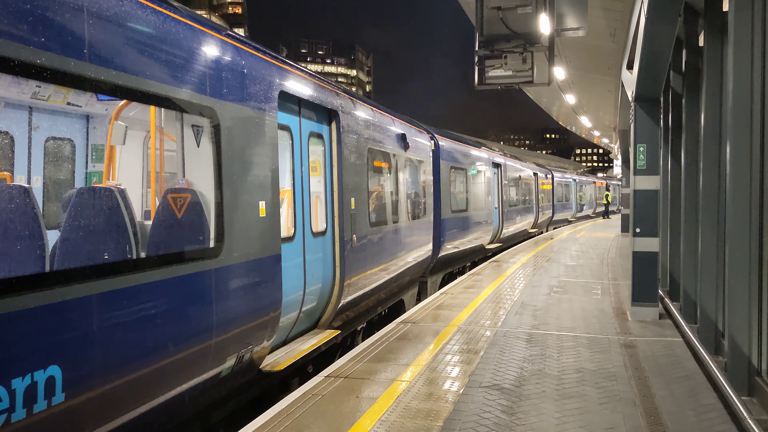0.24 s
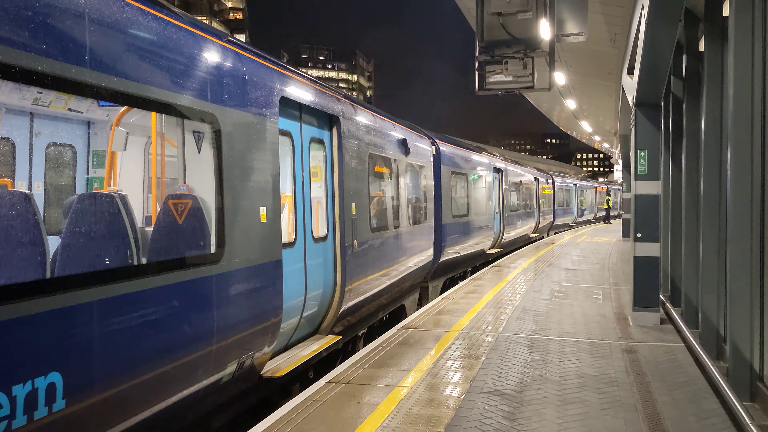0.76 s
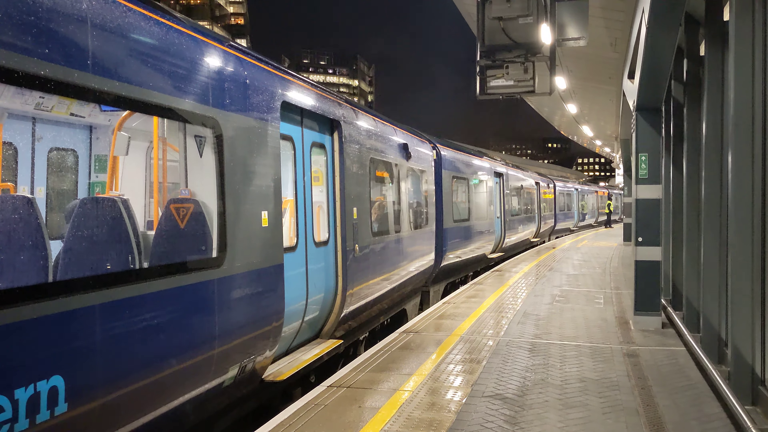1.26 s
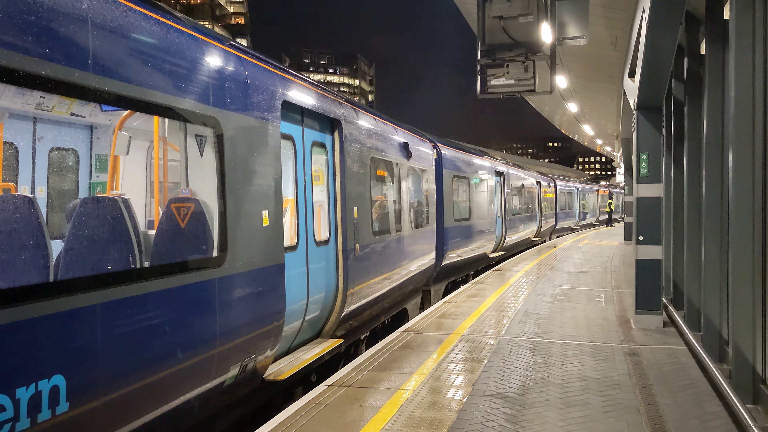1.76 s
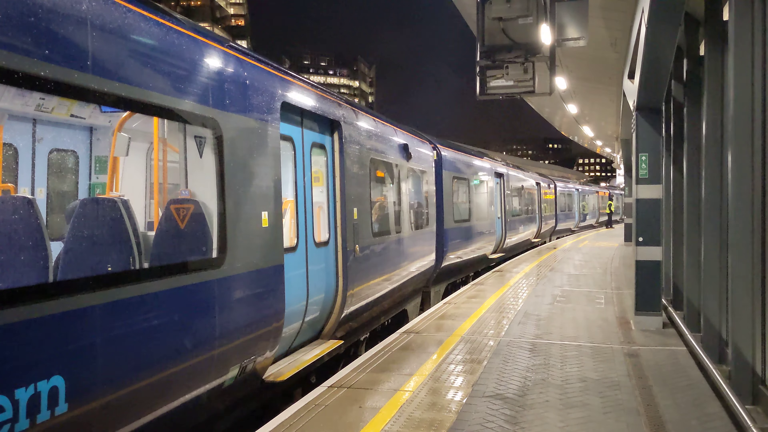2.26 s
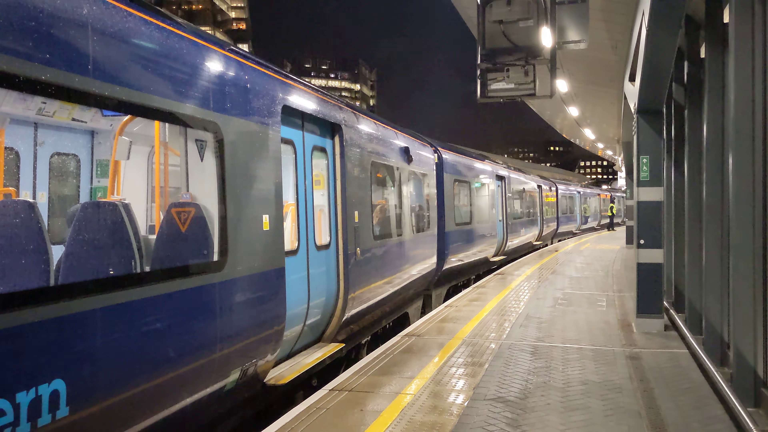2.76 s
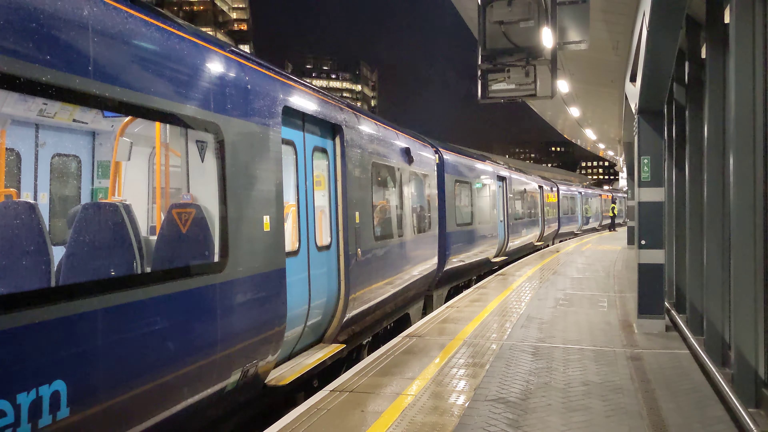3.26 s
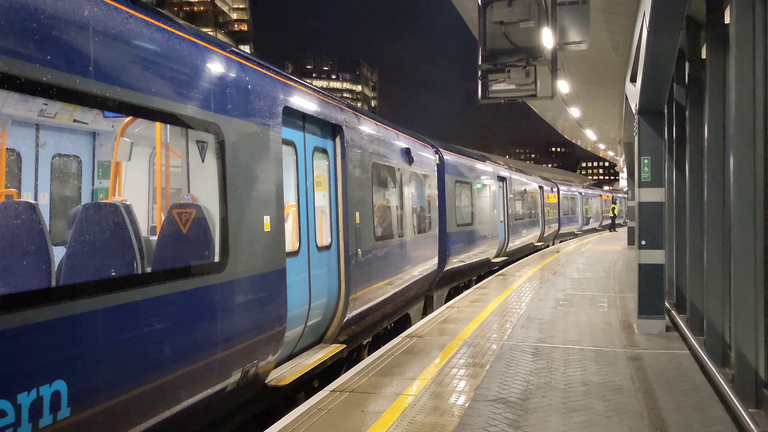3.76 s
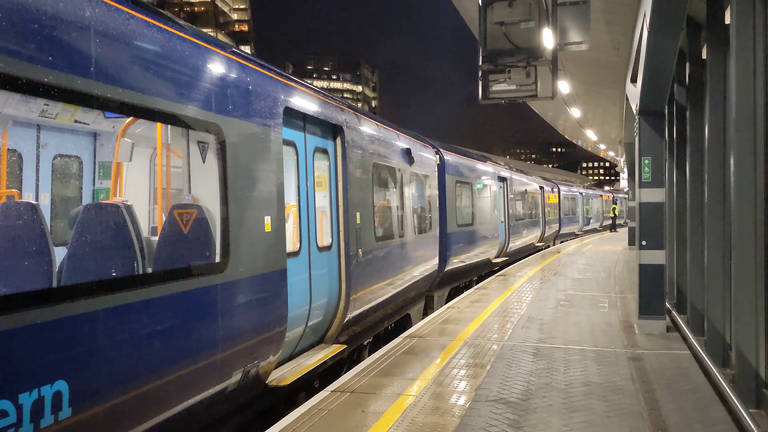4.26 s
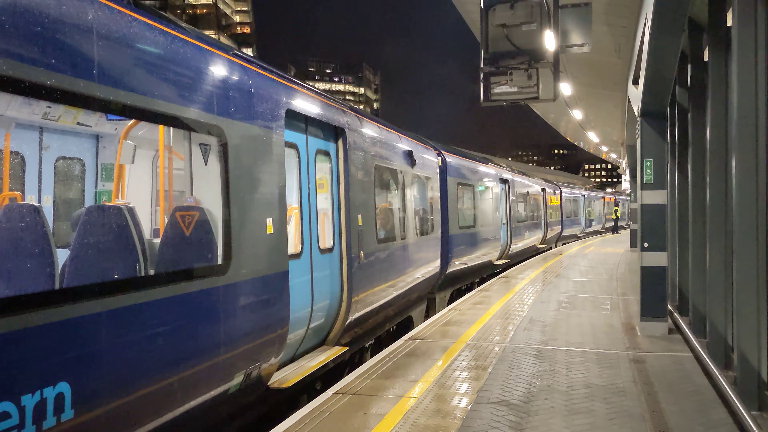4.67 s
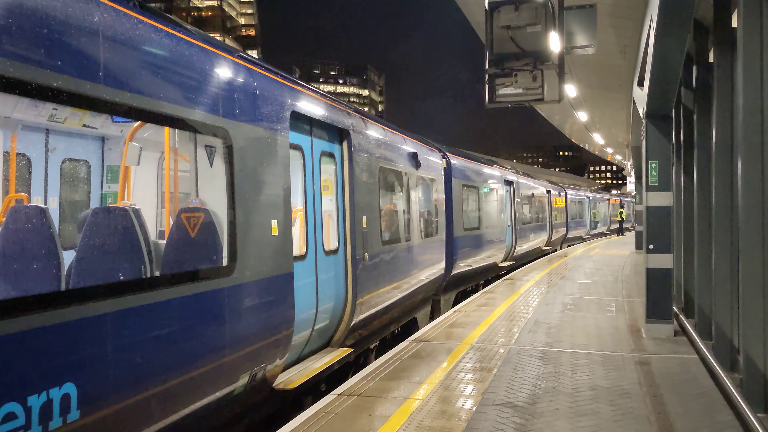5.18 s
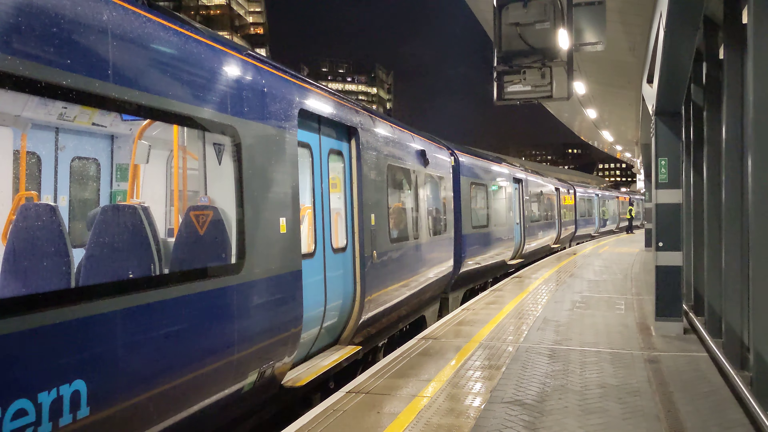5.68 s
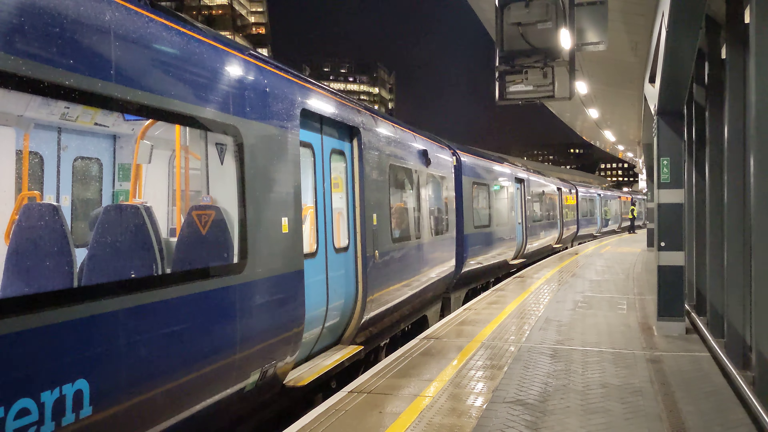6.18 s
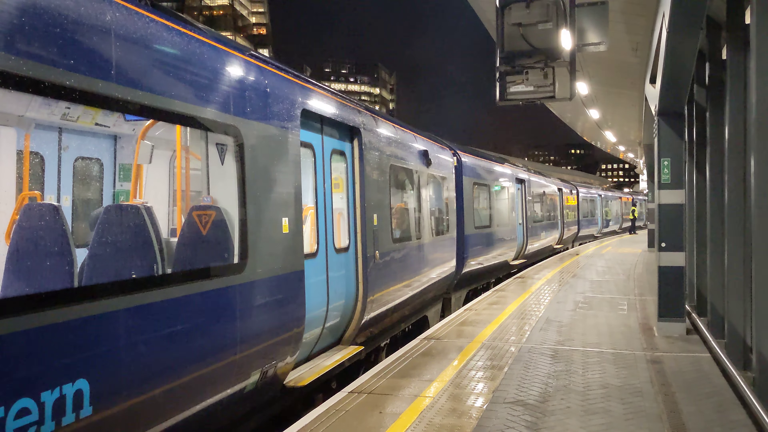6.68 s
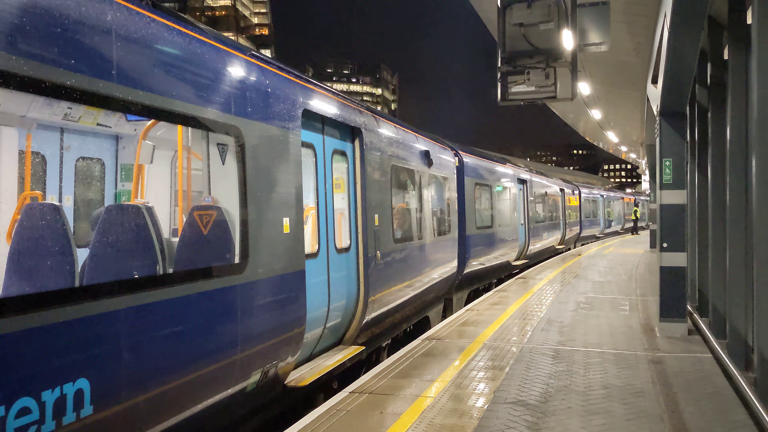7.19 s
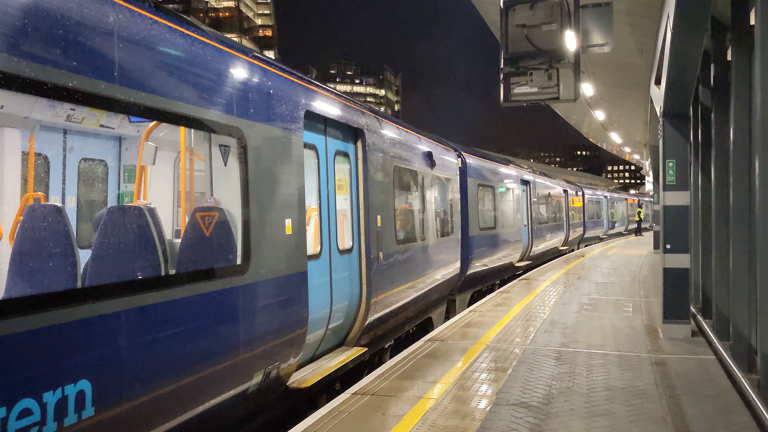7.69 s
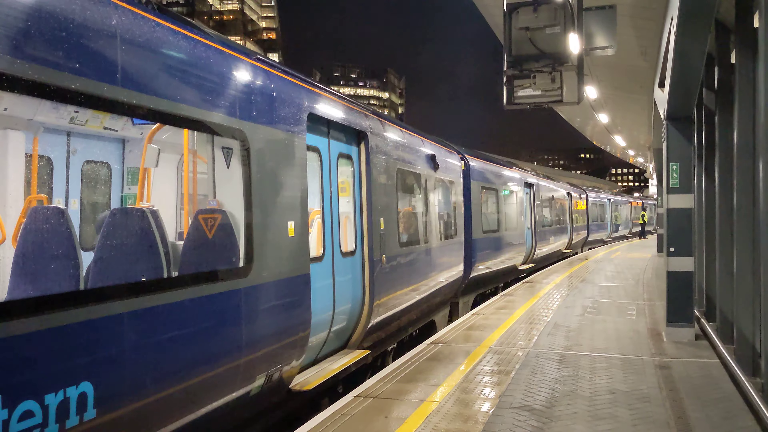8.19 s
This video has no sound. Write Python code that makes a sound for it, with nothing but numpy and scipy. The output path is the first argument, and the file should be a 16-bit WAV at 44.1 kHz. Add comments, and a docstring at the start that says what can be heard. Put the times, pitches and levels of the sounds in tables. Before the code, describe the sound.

A standing electric train drones and whines thinly at a covered platform while wind gusts thump the right microphone, stopping after five seconds

```python
"""A covered, curved platform where an electric train stands still, heard from a hand-held phone with two ports.
Its fans drone as noise shaped by duct resonances, with unsteady blade tones; its converters sing in thin tones,
spread by the canopy and the wall. For the first five seconds gusts buffet the right port: shaped turbulence with
short pressure swings as knocks and a few shaken cycles as thumps. Two brief whines and two faint ticks pass."""
import sys
import numpy as np
from scipy import signal
from scipy.fft import rfft, irfft
from scipy.io import wavfile
from scipy.ndimage import uniform_filter1d

SR = 44100
rng = np.random.default_rng(int(sys.argv[2]) if len(sys.argv) > 2 else 0)


def transcribe(signal):
    """Save signal, clipped to [-1, 1], as a 16-bit WAV file at the path in sys.argv[1]."""
    frames = np.atleast_2d(signal).T
    limited = np.clip(frames, -1, 1)
    pcm = np.round(limited * 32767).astype(np.int16)
    wavfile.write(sys.argv[1], SR, pcm)


N = 372204
TIME = np.arange(N) / SR  # s
FREQ = np.maximum(np.fft.rfftfreq(N, 1 / SR), 1)  # Hz

# Broad fan noise along the train, before ducts and trim. Each row: frequency [Hz], density [dB per Hz].
FAN_NOISE = [(22, -68), (55, -61.5), (95, -69.5), (160, -61.5), (250, -58), (450, -66), (750, -75),
             (1400, -78), (1750, -78), (2800, -82), (4000, -86), (5480, -92.5), (5700, -99.5),
             (6300, -106.5), (9400, -109.5), (10100, -114), (12600, -115), (15400, -120)]
# Duct and blade resonances standing out of it. Each row: frequency [Hz], width [Hz], lift [dB].
DUCT_RESONANCES = [(133, 18, 5.5), (182.3, 16, 2), (207, 24, 3.5), (259, 40, 3.5), (353, 110, 5),
                   (470, 10, 0), (532.2, 27, 5.5), (610, 60, 5.5), (679, 28, 3.5), (726, 21, 1.5),
                   (830, 14, 6), (897, 57, 7), (991, 38, 9), (1155, 21, 6), (1285, 100, 4.5),
                   (2044, 58, 3.5), (2410, 84, 7), (7900, 170, 3.5), (9240, 650, 2)]
# Likeness of the train's noise at the two ports. Each row: frequency [Hz], likeness [clipped to 0-1].
PORT_LIKENESS = [(60, 2), (300, 4), (450, 2), (750, 0.04), (1200, -0.45), (1700, 0.39), (2300, 0.24),
                 (5000, 0.22), (15000, -0.4)]
# Balance of the train's noise. Each row: frequency [Hz], left minus right [dB].
PORT_TILT = [(60, -0.5), (110, -4.5), (200, -3), (380, -1), (700, -2.5), (1290, -5.5), (2380, 2.5),
             (4400, -2.5), (8120, -1), (15000, -3.5)]
# Blade tones of the fans. Each row: frequency [Hz], level [dB].
BLADE_TONES = [(142, -50), (180, -46.5), (196, -46.5), (216, -42.5), (264, -42.5), (273, -45.5), (513, -49),
               (532, -52), (674, -56.5), (970, -60.5), (1011, -56.5), (1192, -64), (2021, -65), (2055, -62),
               (2358, -61.5)]
# Steady tones of the converters. Each row: frequency [Hz], level [dB].
STEADY_TONES = [(1735, -67), (2116, -65), (2215, -70.5), (2696, -82.5), (3324, -67), (4129, -72),
                (4230, -68), (4331, -76), (5036, -80.5), (5137, -78), (5238, -72), (5348, -76), (5398, -72),
                (5422, -75.5), (5438, -76), (5472, -80), (5522, -77), (5539, -81.5), (6144, -93),
                (6346, -93), (6447, -94), (8022, -92.5), (8048, -92), (8460, -99), (8561, -96.5),
                (9187, -96)]
# Converter tones that grow with the load. Each row: frequency [Hz], level at 0 dB load [dB].
LOAD_TONES = [(1336, -63), (1362, -64.5), (1386, -59)]
# Swell of the load. Each row: time [s], load [dB].
LOAD_SWELL = [(0, -16.5), (4, -11.5), (5, 3), (5.9, 1), (6.8, 5), (7.6, 5.5), (8.4, 5)]
# Converter tones that give way to the load. Each row: frequency [Hz], level at 0 dB load [dB],
# loss [dB per dB of load].
IDLE_TONES = [(1406, -63.5, 0.51), (1459, -61, 0.24)]
# Two faint, short whines. Each row: middle [s], length [s], pitch [Hz], level at the middle [dB].
WHINES = [(8.16, .22, 4025, -60), (8.25, .34, 1918, -53)]
# Light draught along the platform, at the right port. Each row: time [s], level before trim [dB].
DRAUGHT = [(0, -30), (0.75, -27.5), (1.0, -44.5), (1.65, -35), (2.8, -45.5), (3.15, -32), (3.5, -50),
           (3.8, -32), (4.9, -32.5), (5.3, -36), (5.6, -63)]
# Gusts on the right port, which faces the wind. Each row: start [s], length [s], level before trim [dB].
GUSTS = [(0.062, 0.069, -21), (0.70, 0.035, -26), (1.06, 0.05, -27.5), (1.338, 0.023, -22),
         (1.46, 0.051, -25), (1.82, 0.72, -20.5), (2.63, 0.034, -22.5), (3.635, 0.054, -23),
         (3.82, 0.04, -28.5), (4.09, 0.098, -28.5), (4.28, 0.12, -22.5), (4.475, 0.26, -26.5)]
# A gust curling round to the left port. Each row: start [s], length [s], level before trim [dB].
LEE_GUSTS = [(2.06, 0.042, -25.5)]
# Colour of the wind noise at the port, with a dip near 110 Hz. Each row: frequency [Hz], relative level [dB].
TURBULENCE = [(22, -10.5), (45, -3.5), (85, -4.5), (112, -11.5), (155, -0.5), (250, -6.5), (380, -8),
              (600, -22), (900, -28.5), (1400, -44.5), (2500, -66.5)]
# Small, hard eddies knocking on the right port. Each row: time [s], peak before trim [dB], centre [Hz],
# ring after it [0-1].
BUFFETS = [(0.062, -15, 438, 0.7), (0.130, -8.5, 367, 0.7), (0.1337, -9, 630, .25),
           (0.148, -16.5, 560, 0.4), (0.548, -19, 500, 0.1), (0.598, -22, 550, 0), (0.795, -21, 520, 0.3),
           (1.351, -15.5, 440, 0.26), (1.425, -18, 450, 0.5), (1.8234, -6, 312, 1), (1.835, -18, 620, .2),
           (1.843, -18, 430, 0.4), (1.8632, -10, 380, .7), (1.896, -16, 400, .3), (1.9105, -20, 400, 0.4),
           (1.9142, -8, 418, 1), (1.9257, -15, 600, 0.6), (2.006, -14, 472, 0.4), (2.074, -11, 392, .9),
           (2.136, -17, 450, .3), (2.156, -17, 420, 0.3), (2.1615, -9.5, 600, 0.1), (2.171, -5, 525, .55),
           (2.19, -10, 500, 0.2), (2.219, -13.5, 390, 0.6), (2.247, -18, 450, .3), (2.2596, -9.5, 450, 0.4),
           (2.279, -5, 330, .8), (2.2930, -8.5, 480, 0.8), (2.2994, -4.5, 490, .2), (2.338, -19, 420, 0.3),
           (2.406, -18, 400, .4), (2.4232, -12.5, 430, .5), (2.485, -9.5, 358, 0.2), (2.532, -18, 470, 0.2),
           (3.626, -16, 290, .9), (3.672, -14, 350, .4), (4.058, -25, 330, .3), (4.100, -19.5, 380, .8),
           (4.156, -10.5, 360, 0.5), (4.2602, -8.5, 275, 0.9), (4.3002, -12.5, 400, 0.8),
           (4.309, -20, 470, 0.2), (4.318, -13, 360, .5), (4.329, -23, 380, .9), (4.392, -16, 270, 0.7),
           (4.478, -10, 440, .45), (4.487, -18, 390, 0.5), (4.551, -15, 480, 0.3), (4.623, -12.5, 370, 0.4),
           (4.696, -15, 360, 0.5), (4.7043, -12.5, 620, 0.6), (4.718, -13, 430, 0.3),
           (4.8502, -8.5, 434, 0.8), (5.026, -16, 430, 0.6)]
# Big, slow eddies thumping on the right port. Each row: time [s], peak before trim [dB], pitch [Hz].
THUMPS = [(0.076, -15, 140), (0.121, -6, 168), (0.469, -12, 218), (1.347, -9.5, 158), (1.429, -14, 150),
          (1.784, -10.5, 170), (1.841, -7, 159), (1.856, -8, 159), (1.887, -7, 184), (1.924, -8, 219),
          (2.001, -15, 186), (2.076, -10, 197), (2.115, -4.5, 159), (2.149, -5, 155), (2.207, -6, 177),
          (2.287, -9.5, 170), (2.362, -11, 161), (2.429, -10, 142), (2.465, -8, 188), (2.635, -9.5, 177),
          (3.645, -8.5, 166), (3.685, -7.5, 135), (4.12, -19, 130), (4.275, -14, 119), (4.339, -19, 150),
          (4.499, -10, 156), (4.562, -13.5, 190), (4.637, -17, 140), (4.71, -11.5, 224)]
# Tiny high ticks. Each row: time [s], strike level before the treble filter and halving [dB].
TICKS = [(4.574, -47), (7.2015, -51)]

PORT_LAG_S = .00031  # the part of the train's noise common to both ports reaches the left this much later
GUST_ATTACK_S, GUST_RELEASE_S = 0.02, 0.027  # time constants shared by all gusts
LEE_DB = -21  # the left port lies in the lee and gets this share of the wind
# lesser eddies: number a second, peak over the wind's level before trim and its spread
EDDY_RATE, EDDY_DB, EDDY_SPREAD_DB = 20, -2, 3
EDDY_HZ, EDDY_SPREAD_OCT = 394, 0.64  # their centre and its spread in octaves
TOP_HZ = 15600  # upper edge of the phone's band


def fans(drone_db=0.1, swell_db=0.43, hiss_swell_db=0.32, split_hz=900):
    """Air noise through resonant ducts; the bass is alike at both ports, the treble comes from all sides."""
    db = spectrum(FAN_NOISE)
    for hz, width, lift in DUCT_RESONANCES:
        db = db + lift / (1 + (2 * (FREQ - hz) / width) ** 2)
    gain = undb(db + drone_db) * np.sqrt(SR / 2)
    alike = np.clip(spectrum(PORT_LIKENESS), 0, 1)
    common = white() * np.sqrt(alike)
    delayed = common * np.exp(-2j * np.pi * FREQ * PORT_LAG_S)
    half_tilt = spectrum(PORT_TILT) / 2
    left = (delayed + white() * np.sqrt(1 - alike)) * undb(half_tilt)
    right = (common + white() * np.sqrt(1 - alike)) * undb(-half_tilt)
    air = np.array([left * canopy(), right * canopy()]) * gain
    low = 1 / (1 + (FREQ / split_hz) ** 2)
    # the drone throbs a little, the hiss swells more slowly
    drone = irfft(air * low, N) * undb(swell_db * walk(13))
    hiss = irfft(air * (1 - low), N) * undb(hiss_swell_db * walk(2.4))
    return drone + hiss


def canopy(count=40):
    """Response of weak reflections off canopy, wall and cars: they ripple the treble most."""
    echoes = np.zeros(N)
    lags = rng.uniform(.004, .045, size=count)  # s
    echoes[(lags * SR).astype(int)] = .045 * rng.standard_normal(count)
    return 1 + rfft(echoes) * FREQ / (FREQ + 900)


def blades(diffuse_hz=600, fade_db=1.3, fade_rate=1.79):
    """Unsteady blade tones, each fading on its own; long waves are the same at both ports."""
    out = np.zeros((2, N))
    for hz, db in BLADE_TONES:
        pair = tone(hz, waver_rate=6, scatter=0.87) * unit(undb(fade_db * walk(fade_rate)))
        out += undb(db) * (pair if hz > diffuse_hz else pair[0])
    return out


def converters():
    """Switching tones from the coils under the cars; some grow with the load and some give way."""
    load_db = curve(LOAD_SWELL)
    constant = sum(undb(db) * tone(hz, waver_rate=4, scatter=0.55) for hz, db in STEADY_TONES)
    loaded = sum(undb(db) * tone(hz, waver_rate=3.2, scatter=0.23) for hz, db in LOAD_TONES)
    idle = np.zeros((2, N))
    for hz, db, loss in IDLE_TONES:
        idle += undb(db - loss * load_db) * tone(hz, waver_rate=5, scatter=1.0)
    return constant + loaded * undb(load_db) + idle


def whine():
    """Brief thin squeaks: wavering tones under a half-ellipse swell."""
    out = np.zeros((2, N))
    for middle, length, hz, db in WHINES:
        swell = np.sqrt(np.clip(1 - (2 * (TIME - middle) / length) ** 2, 0, 1))
        out += undb(db) * swell * tone(hz, waver_rate=20, scatter=0.55)
    return out


def wind(gust_db, wind_db, flutter_db=3.0, rasp_db=7.0, rasp_hz=420, rasp_level_db=-3.0, brighten=0.042,
         strong_db=-16, deep_hz=110, rumble_db=-1.7, deep_db=-4.0, deep_growth=0.96):
    """Turbulence at one port; small eddies spurt and outgrow the rumble, the deepest heaves more slowly."""
    flow = white() * undb(spectrum(TURBULENCE)) / (1 + (FREQ / 3000) ** 4)
    flow = flow / np.std(irfft(flow, N))
    large = 1 / (1 + (FREQ / rasp_hz) ** 4)
    deep = 1 / (1 + (FREQ / deep_hz) ** 6)
    over_db = gust_db - strong_db
    flutter = unit(undb(flutter_db * walk(45)))
    rumble = even_out(irfft(flow * large * (1 - deep), N), window_s=0.03) * flutter * undb(rumble_db)
    heave = even_out(irfft(flow * deep, N), window_s=0.12) * undb(deep_db + (deep_growth - 1) * over_db)
    spurts = unit(undb(rasp_db * walk(130)))
    rasp = irfft(flow * (1 - large), N) * spurts * undb(rasp_level_db + brighten * over_db)
    return (heave + rumble + rasp) * undb(gust_db + wind_db)


def gust_power(gusts):
    """Power of gusts that build, hold and die away exponentially."""
    power = np.zeros(N)
    for start, length, db in gusts:
        early = np.maximum(start - TIME, 0)
        late = np.maximum(TIME - start - length, 0)
        power += (undb(db) * np.exp(-early / GUST_ATTACK_S - late / GUST_RELEASE_S)) ** 2
    return power


def thumps(thump_db=-3.0, build_s=0.0037, fade_s=0.009, heave_db=-17, heave_hz=38):
    """Each big eddy shakes the air at the port for a few cycles, over one deep heave of pressure."""
    out = np.zeros(N)
    for (s, db, hz), turn in zip(THUMPS, rng.uniform(size=len(THUMPS))):
        near, age = around(s)
        envelope = np.exp(-(age / np.where(age < 0, build_s, fade_s)) ** 2)
        shake = np.sin(2 * np.pi * (hz * age + turn)) * envelope
        heave = undb(heave_db) * swing(2 * np.pi * heave_hz * age)
        out[near] += undb(db + thump_db) * (shake + heave)
    return out


def buffets(rows, knock_db=-0.5, ring_hz=175, glide_s=0.0016, ring_s=0.01, edge_db=-27, edge_ratio=1.7,
            shred_db=-17, build_s=.003, shred_s=0.0094, count=4096):
    """Each small eddy pulls and pushes the air once, then rings with a fast glide to ring_hz and a ragged tail."""
    out = np.zeros(N)
    for s, db, hz, ring in rows:
        near, age = around(s)
        angle, after = 2 * np.pi * hz * age, np.maximum(age, 0)
        # the second, quicker swing steepens the edge
        pull_push = swing(angle) + undb(edge_db) * swing(edge_ratio * angle)
        # phase of a ring gliding from the eddy's centre to ring_hz
        turns = ring_hz * after + (hz - ring_hz) * glide_s * (1 - np.exp(-after / glide_s))
        onset = 1 - np.exp(-(np.pi * hz * after) ** 2)
        wake = np.sin(2 * np.pi * turns) * onset * np.exp(-after / ring_s)
        band = signal.butter(3, [hz / 2, hz * 1.6], "band", fs=SR, output="sos")
        shred = unit(signal.sosfilt(band, np.resize(rng.standard_normal(count), len(age))))
        shred = shred * np.exp(-np.abs(age) / np.where(age < 0, build_s, shred_s))
        knock = pull_push + np.clip(ring, 0, 1) * wake + undb(shred_db) * shred
        out[near] += undb(db + knock_db) * knock
    return out


def eddies(gust_db, count=400, hardest_db=-20, ring=0.29):
    """Lesser eddies at random moments, as buffet rows; their strength follows the wind up to a ceiling."""
    times = np.cumsum(rng.exponential(size=count)) / EDDY_RATE
    strength, pitch = rng.standard_normal((count, 2)).T
    carried_db = np.interp(times, TIME, gust_db) + EDDY_DB + EDDY_SPREAD_DB * strength
    db = np.minimum(carried_db, hardest_db)
    hz = EDDY_HZ * 2 ** (EDDY_SPREAD_OCT * pitch)
    rows = np.column_stack([times, db, hz, np.full(count, ring)])
    return rows[times < TIME[-1]]


def ticks(decay_s=.002, tail_db=-17, tail_s=.025, edge_hz=7500):
    """Faint dry ticks: bursts of treble noise, each with a short tail."""
    strikes = np.zeros(N)
    for s, db in TICKS:
        age = np.abs(TIME - s)
        decay = np.exp(-age / decay_s) + undb(tail_db) * np.exp(-age / tail_s)
        strikes += undb(db) * decay * (TIME >= s)
    treble = signal.butter(2, min(edge_hz, SR / 3), "high", fs=SR, output="sos")
    return signal.sosfilt(treble, strikes * rng.standard_normal((2, N)) / 2)


def tone(hz, waver_rate, scatter):
    """A tone at both ports, a quarter turn apart, with reflections that waver in level and phase."""
    carrier = np.exp(1j * (2 * np.pi * hz * TIME + rng.uniform(0, 2 * np.pi)))
    ports = []
    for direct in (1, 1j):
        reflected = walk(waver_rate) + 1j * walk(waver_rate)
        ports.append(carrier * (direct + scatter * reflected))
    return unit(np.real(ports))


def swing(angle):
    """One pull and push of pressure, peak 1."""
    return angle * np.exp(.5 - .5 * angle ** 2)


def around(s):
    """The samples within 60 ms of a moment, and their time from it in seconds."""
    near = slice(*np.searchsorted(TIME, [s - .06, s + .06]))
    return near, TIME[near] - s


def even_out(x, window_s):
    """Noise divided by its running rms, so that its level holds near 1."""
    return x / np.sqrt(uniform_filter1d(x ** 2, max(int(window_s * SR), 8)))


def walk(rate):
    """Smooth random motion of spread about 1 that changes about rate times a second."""
    coarse = signal.resample_poly(rng.standard_normal(int(N / SR * rate) + 4), 8, 1)
    return np.interp(TIME * rate * 8, np.arange(len(coarse)), coarse)


def white():
    """Spectrum of fresh white noise."""
    return rfft(rng.standard_normal(N))


def spectrum(rows):
    """Rows (Hz, value) joined on a log-frequency axis."""
    hz, value = np.transpose(rows)
    return np.interp(np.log(FREQ), np.log(hz), value)


def curve(rows):
    """Rows (s, value) joined by straight lines."""
    return np.interp(TIME, *np.transpose(rows))


def unit(x):
    """Scale to rms 1."""
    return x / np.sqrt(np.mean(np.abs(x) ** 2))


def undb(db):
    """Decibels to gain."""
    return 10 ** (np.asarray(db) / 20)


def scene():
    """The standing train, with the wind full on the right port and weak on the left."""
    windward = undb(curve(DRAUGHT)) ** 2 + gust_power(GUSTS)
    lee = windward * undb(LEE_DB) ** 2 + gust_power(LEE_GUSTS)
    left_db, right_db = 10 * np.log10([lee, windward])
    knocks = thumps() + buffets(BUFFETS) + buffets(eddies(right_db))
    breeze = np.array([wind(left_db, wind_db=1.0), wind(right_db, wind_db=0.5) + knocks])
    train = fans() + blades() + converters()
    return train + whine() + breeze + ticks()


def record(dry, ceiling=1.2):
    """The phone drops the deepest rumble, rounds the loudest peaks and cuts the top."""
    rumble_cut = signal.butter(2, 18, "high", fs=SR, output="sos")
    sound = signal.sosfilt(rumble_cut, dry)
    sound = ceiling * np.tanh(sound / ceiling)
    top_cut = signal.ellip(10, .2, 80, TOP_HZ, fs=SR, output="sos")
    return signal.sosfilt(top_cut, sound)


dry = scene()
out = record(dry)
transcribe(out)
```